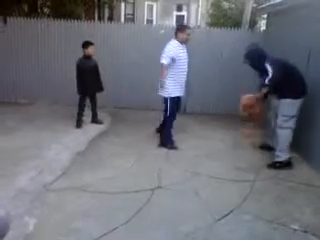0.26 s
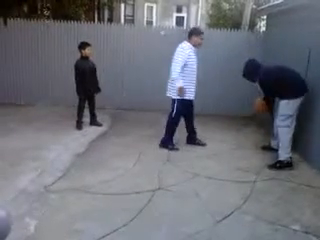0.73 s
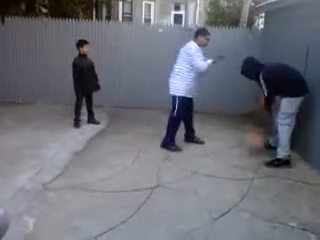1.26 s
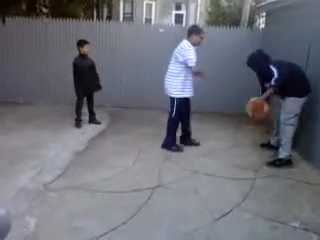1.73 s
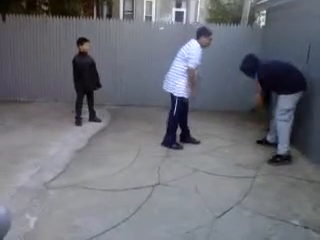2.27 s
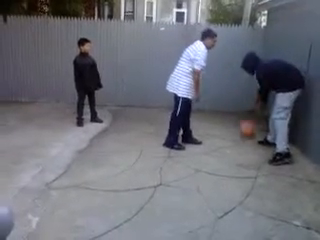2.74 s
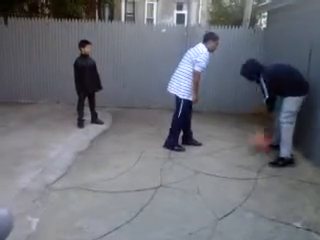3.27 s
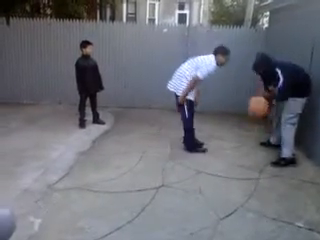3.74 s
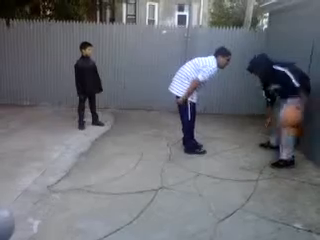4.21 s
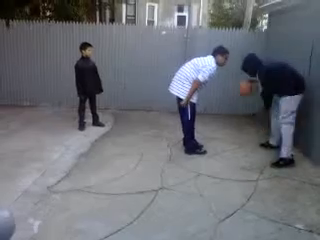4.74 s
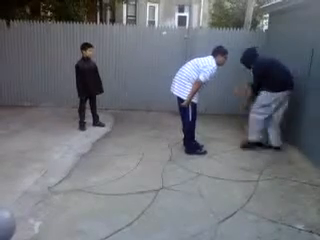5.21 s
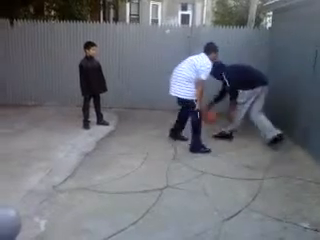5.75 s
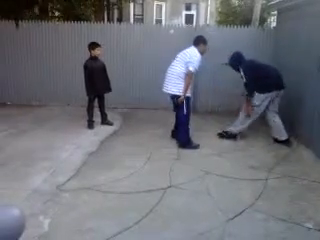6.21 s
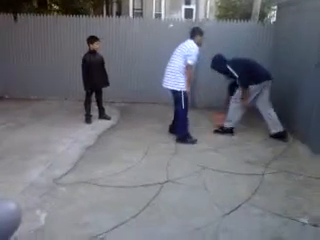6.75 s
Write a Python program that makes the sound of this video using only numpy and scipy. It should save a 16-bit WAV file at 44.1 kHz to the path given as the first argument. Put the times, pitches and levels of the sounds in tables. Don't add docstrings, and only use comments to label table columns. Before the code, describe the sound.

Eleven or so firm basketball bounces on a hard outdoor slab, hollow and rubbery, slapping back from close walls with a short tail. A faint scuff and low wind buffets open the scene; small shoe contacts occur between bounces. Toward the end the leaf hiss rises slightly and a softer double contact precedes one last bright bounce. The sound is dull, lo-fi and grainy, from a small camera a few metres away.

```python
import sys
import numpy as np
from scipy import signal
from scipy.fft import rfft, irfft
from scipy.io import wavfile
from scipy.ndimage import uniform_filter1d

SR = 44100
rng = np.random.default_rng(int(sys.argv[2]) if len(sys.argv) > 2 else 0)


def master(y):
    cut = np.clip(np.atleast_2d(y).T, -1, 1)
    pcm = np.round(cut * 32767)
    wavfile.write(sys.argv[1], SR, pcm.astype(np.int16))


def nominal_scale(level):
    x = np.asarray(level, float) / 20
    return 10 ** x


N = 307805
SPAN = SR // 2


def at_hz(points, hz):
    table_hz, values = np.transpose(points)
    return np.interp(np.log(np.maximum(hz, 1)), np.log(table_hz), values)


def in_time(rows):
    s, *columns = np.transpose(rows)
    return [np.interp(np.arange(N) / SR, s, c) for c in columns]


def rms_one(x):
    return x / np.sqrt(np.mean(x ** 2) + 1e-20)


def band(x, low_hz, high_hz):
    return signal.sosfilt(signal.butter(2, [low_hz, high_hz], "band", fs=SR, output="sos"), x)


def fading(t60):
    return nominal_scale(-60 * np.arange(SPAN) / SR / t60)


def ring(x, hz, t60):
    r = nominal_scale(-60 / (t60 * SR))
    w = 2 * np.pi * hz / SR
    return signal.lfilter([0, np.sin(w)], [1, -2 * r * np.cos(w), r * r], x + 1e-18)


def add(out, sound, s):
    i = round(s * SR)
    out[i:i + len(sound)] += sound[:N - i]


def shaken(contact, tilt_db):
    # f/Hz, width/Hz, level/dB
    skin_modes = [(1096, 510, -0.5), (1620, 450, 0.5), (2160, 400, -6.5), (3147, 680, -8.5),
                  (4690, 650, -34)]
    # f/Hz, level/dB, t60/s
    air_modes = [(1101, -34.5, 0.1), (1395, -29.5, 0.096), (1530, -31.5, 0.066), (2030, -32, 0.083)]
    skin, air = np.zeros(SPAN), np.zeros(SPAN)
    for k, (hz, width, db) in enumerate(skin_modes):
        level = nominal_scale(db + tilt_db * np.log2(hz / 1600))
        t60 = np.log(1000) / np.pi / width
        skin += (-1) ** k * level * ring(contact, hz, t60)
    for hz, db, t60 in air_modes:
        air += nominal_scale(db) * ring(contact, hz, t60)
    return (skin + air) / np.abs(skin).max()


def slap(burst_t60, rise=.0015, tilt_db=0):
    onset = np.minimum(np.arange(SPAN) / SR / rise, 1)
    contact = rng.standard_normal(SPAN) * fading(burst_t60) * onset
    return shaken(contact, tilt_db)


def thump(hz, t60, upper_db=-4):
    push = np.zeros(SPAN)
    push[40:100] = np.hanning(60)
    body = ring(push, hz, t60)
    body += nominal_scale(upper_db) * ring(push, 310, 0.025)
    body += nominal_scale(-8) * ring(push, 118, 0.055)
    body = signal.sosfilt(signal.butter(2, 75, "high", fs=SR, output="sos"), body)
    return body / np.abs(body).max()


def yard(echo_db, tail_db):
    # f/Hz, t60/s
    tail_t60 = [(60, 0.22), (400, 0.38), (1200, 0.36), (3000, 0.22), (6000, 0.15)]
    t = np.arange(SPAN) / SR
    draws = rng.random((2, SPAN))
    sparse = (draws[0] < 1500 / SR) * (2 * draws[1] - 1)
    near = sparse * np.clip((t - .003) / .010, 0, 1) * np.clip((.045 - t) / .006, 0, 1)
    white = rng.standard_normal(SPAN)
    tail = np.zeros(SPAN)
    for low_hz in 100 * 2. ** np.arange(6):
        t60 = at_hz(tail_t60, low_hz * np.sqrt(2))
        tail += band(white, low_hz, 2 * low_hz) * fading(t60)
    return nominal_scale(echo_db) * near + nominal_scale(tail_db - 11) * tail * np.clip(t / 0.024, 0, 1)


def shoes():
    # t/s, peak level/dB, thud re scuff/dB, length/s
    scuffs = [(0.001, -35, -17.5, 0.09), (0.134, -42, -35, 0.024), (0.153, -47, -28, 0.042),
              (1.998, -41, -14.5, 0.012), (2.012, -55, -7, 0.047), (3.909, -53.5, -10.5, 0.03),
              (5.771, -40, -29.5, 0.022), (5.795, -45, -23.5, 0.026), (5.862, -45.5, -25.5, 0.03),
              (6.339, -37, -37, 0.036), (6.347, -30.5, -36.5, 0.012), (6.366, -37.5, -25, 0.016)]
    out = np.zeros(N)
    click = np.arange(SPAN) == 0
    for s, db, thud_db, length in scuffs:
        scuff = slap(max(length, .005), rise=0.0022, tilt_db=0.5)
        thud = nominal_scale(thud_db + 15.5) * thump(hz=234, t60=0.07)
        thrown = shaken(click, tilt_db=-3)
        returns = signal.fftconvolve(thrown, yard(echo_db=-11, tail_db=-18))[:SPAN]
        add(out, nominal_scale(db) * (scuff + thud + returns), s)
    return out


def wind():
    # t/s, level/dB
    gust_curve = [(0.0, -48), (0.15, -56.5), (0.31, -55), (0.7, -60.5), (0.85, -72), (1.11, -70.5),
                  (1.36, -58), (1.5, -49.5), (1.59, -45), (1.77, -60.5), (2.0, -54.5), (2.14, -45),
                  (2.19, -57), (2.31, -52), (2.47, -55.5), (2.55, -71), (2.76, -62), (2.95, -65),
                  (3.05, -65), (3.81, -63.5), (4.14, -68.5), (4.45, -65.5), (4.63, -68), (4.78, -63.5),
                  (5.48, -66.5), (5.6, -64), (5.75, -61.5), (6.1, -66.5), (6.42, -61.5), (6.65, -78),
                  (6.8, -67), (6.98, -67.5)]
    # t/s, peak level/dB, swing f/Hz
    buffets = [(0.069, -44.5, 32.7), (0.254, -40, 38.5), (0.276, -41.5, 80), (0.304, -40, 55),
               (0.5, -46.5, 78.1), (1.384, -40, 72.7), (1.429, -45, 119), (1.659, -46.5, 53.3),
               (1.978, -37, 34.8), (2.067, -34, 91), (2.104, -37, 70.4), (2.47, -48, 64.6),
               (2.799, -49, 32.5), (3.738, -52.5, 32.3), (5.678, -46.5, 45.8)]
    gust_db, = in_time(gust_curve)
    lumps = nominal_scale(3.0 * rms_one(band(rng.standard_normal(N), 5, 27)))
    rumble = rms_one(band(rng.standard_normal(N) * lumps, 23, 120))
    out = nominal_scale(gust_db) * rumble
    for s, db, hz in buffets:
        turns = np.arange(int(1.6 * SR / hz)) * hz / SR
        add(out, nominal_scale(db) * np.sin(2 * np.pi * turns) * np.hanning(len(turns)), s)
    return out


def coloured(spectrum, patchy_db):
    white = rfft(rng.standard_normal(N))
    noise = irfft(white * nominal_scale(at_hz(spectrum, np.arange(len(white)) * SR / N)), N)
    flicker = nominal_scale(patchy_db * rms_one(band(rng.standard_normal(N), 2, 12)))
    return rms_one(noise * flicker)


def far_town_and_leaves():
    # t/s, town hum/dB, leaf hiss/dB
    far_levels = [(0.0, -59, -71.5), (0.19, -66.5, -76), (0.72, -65.5, -74), (0.93, -68, -77.5),
                  (1.85, -66, -72.5), (2.91, -66.5, -74.5), (3.03, -62, -77.5), (3.26, -70.5, -80),
                  (4.04, -67, -75.5), (4.47, -68.5, -76), (5.35, -63.5, -61.5), (6.22, -62, -58.5),
                  (6.55, -62, -65), (6.98, -67, -60.5)]
    # f/Hz, level/dB per Hz
    hum_spectrum = [(88, -43.5), (150, 3.5), (361, -7), (1030, -7.5), (1180, -10), (1490, -6), (1830, -6.5),
                    (2070, -4.5), (4000, -13), (5200, -46), (8800, -120)]
    # f/Hz, level/dB per Hz
    leaf_spectrum = [(2350, -31.5), (4000, -5.5), (5030, -2.5), (6680, -5.5), (7380, 7.5), (7600, -37),
                     (9880, -69), (16700, -120)]
    hum_db, leaves_db = in_time(far_levels)
    hum = nominal_scale(hum_db + 3.5) * coloured(hum_spectrum, patchy_db=0.68)
    leaves = nominal_scale(leaves_db) * coloured(leaf_spectrum, patchy_db=.5)
    return hum + leaves


def ball():
    # t/s, slap peak/dB, thump re slap/dB, thump f/Hz, upper thump/dB, brightness/dB per octave
    bounces = [(0.771, -17.5, -15.5, 184.5, -3.5, 1), (1.516, -21.5, -13, 243.5, -2, -1.8),
               (2.292, -23.5, -9, 243.6, -3, 0), (3.002, -15.5, -16.5, 121, -2.5, 0.6),
               (3.492, -25.5, -5, 138.7, -1.5, -0.5), (4.162, -18, -14.5, 119, -2, -0.3),
               (4.735, -18, -9.5, 237, -6, 0), (5.421, -15.5, -15.5, 122.4, -5, 2),
               (5.949, -27.5, -5.5, 222, -2.5, 0.4), (5.967, -22, -2.5, 200.5, -8, -2),
               (6.444, -19.5, -18.5, 130.2, -2, 4.2)]
    # near returns/dB, late tail/dB, share of thump/dB
    spots = [(-14, -16, -1.5), (-10, -12, -2.5), (-7.5, -12.5, -4.5), (-14.5, -16, -6), (-9, -14.5, -4.5),
             (-12.5, -14.5, -5), (-11.5, -13, -4.5), (-10, -14, -3.5), (-1, -9.5, -3.5), (-13, -17.5, -4.5),
             (-9.5, -12.5, -4.5)]
    # t/s, peak level/dB, thump re slap/dB
    wall_returns = [(0.786, -31.5, -35), (0.795, -18, -4), (0.804, -19.5, -18), (1.542, -27, -25),
                    (2.321, -36.5, 2), (3.01, -17, -15.5), (3.018, -12, -12), (3.517, -30, -25),
                    (4.182, -28, 1.5), (4.744, -17, -10), (4.75, -30, -8), (5.442, -19.5, -4.5),
                    (6.012, -38, -18), (6.453, -16, -20), (6.47, -14, -12.5)]
    out = np.zeros(N)
    click = np.arange(SPAN) == 0
    for bounce, (echo_db, tail_db, share_db) in zip(bounces, spots):
        s, db, thump_db, hz, upper_db, tilt_db = bounce
        low = nominal_scale(thump_db + 8) * thump(hz, t60=0.048, upper_db=upper_db)
        thrown = shaken(click, tilt_db - 2.5) + nominal_scale(share_db) * low
        returns = signal.fftconvolve(thrown, yard(echo_db, tail_db))[:SPAN]
        add(out, nominal_scale(db) * (slap(0.017, tilt_db=tilt_db) + low + returns), s)
    for s, db, thump_db in wall_returns:
        low = nominal_scale(thump_db) * thump(hz=194.6, t60=.05)
        add(out, nominal_scale(db - 5) * (slap(burst_t60=.012, tilt_db=-1.5) + low), s)
    return out


def scene():
    return (shoes() + wind() + far_town_and_leaves() + ball())[None]


def starved_storage(x, headroom_db, own_share):
    rate, size, frame_start = 16000, 128, 960
    group = 8 * size
    lead = group - frame_start + size // 2
    low = signal.resample_poly(x, rate, SR)
    after = 2 * group - (lead + len(low)) % group + size
    halves = np.pad(low, (lead, after)).reshape(-1, size)
    n, k = np.arange(2 * size)[:, None] + .5, np.arange(size) + .5
    window = np.sin(np.pi * n / 2 / size)
    basis = window * np.cos(np.pi / size * (n + size / 2) * k) * np.sqrt(2 / size)
    frames = (np.hstack([halves[:-1], halves[1:]]) @ basis).reshape(-1, 8, size)
    power = (frames ** 2).mean(axis=1, keepdims=True) + 1e-18
    overall = power.mean(axis=2, keepdims=True)
    local = uniform_filter1d(power, size=9, axis=2)
    step = np.sqrt(overall ** (1 - own_share) * local ** own_share) * nominal_scale(-headroom_db)
    blocks = (np.round(frames / step) * step).reshape(-1, size) @ basis.T
    joined = blocks[1:, :size] + blocks[:-1, size:]
    return signal.resample_poly(joined.ravel()[lead - size:], SR, rate)[:N]


def roll_off(x):
    return signal.sosfilt(signal.butter(12, 7940, fs=SR, output="sos"), x)


def record(dry):
    dull = signal.sosfilt(signal.cheby2(8, 40, 7700, fs=SR, output="sos"), dry[0])
    stored = starved_storage(dull, headroom_db=9.5, own_share=.3)
    mix = stored[None] + nominal_scale(-99) * rng.standard_normal((1, N))
    return roll_off(mix)


dry = scene()
out = record(dry)
master(out)
```